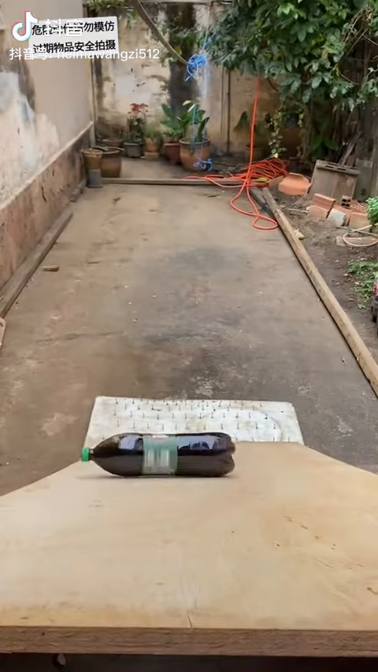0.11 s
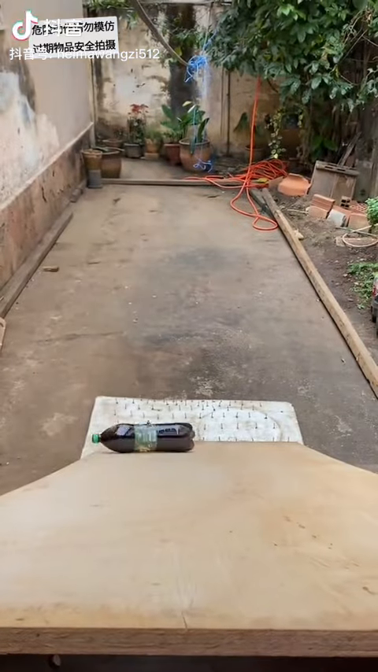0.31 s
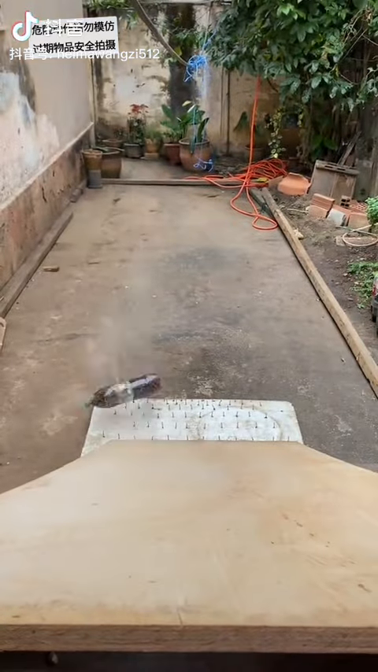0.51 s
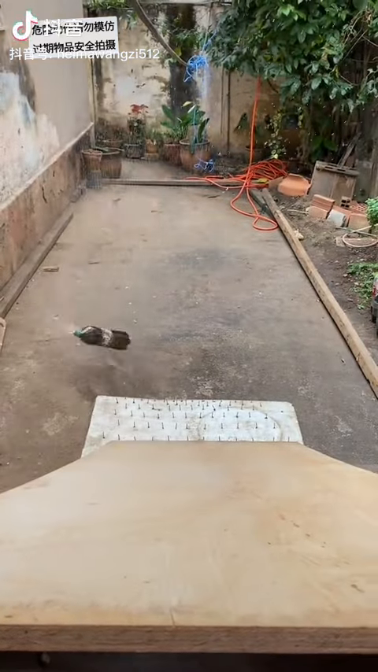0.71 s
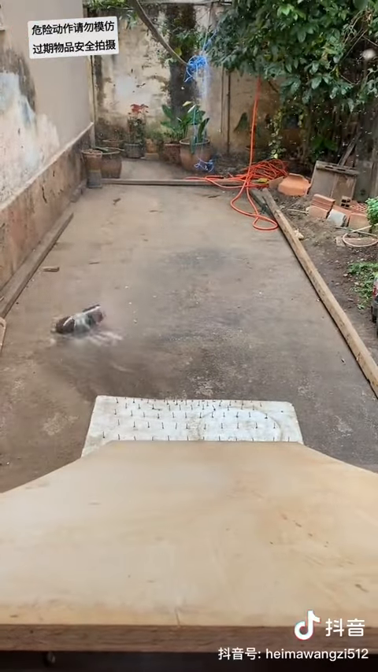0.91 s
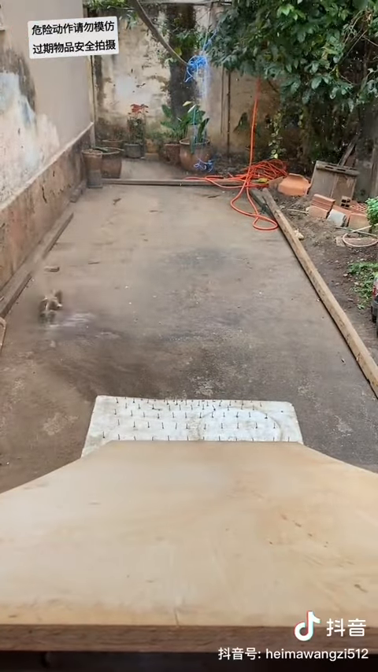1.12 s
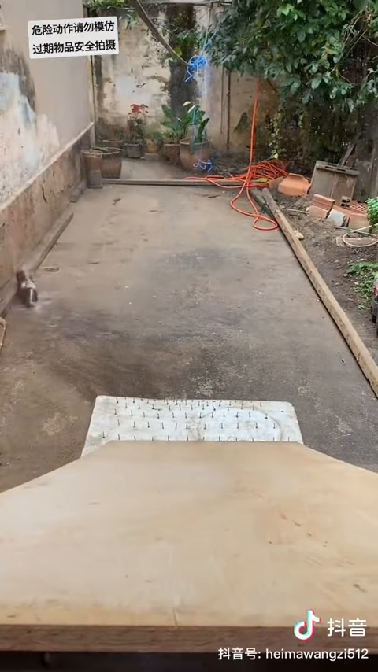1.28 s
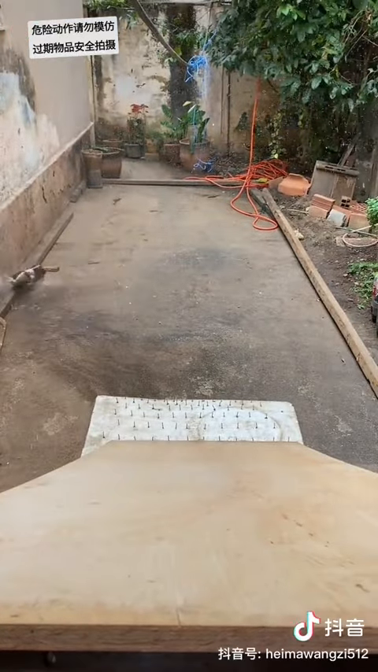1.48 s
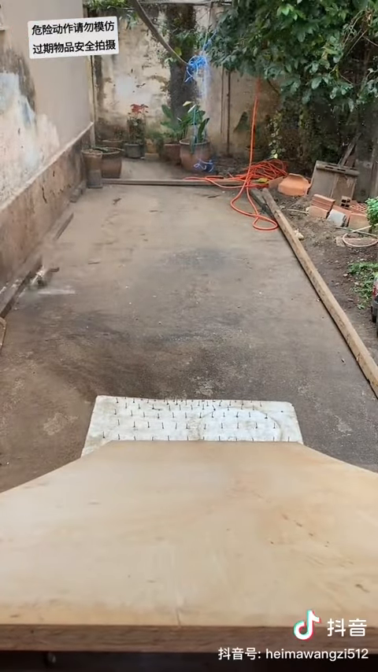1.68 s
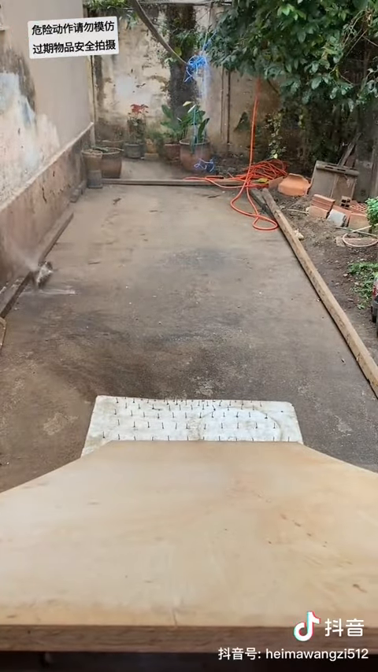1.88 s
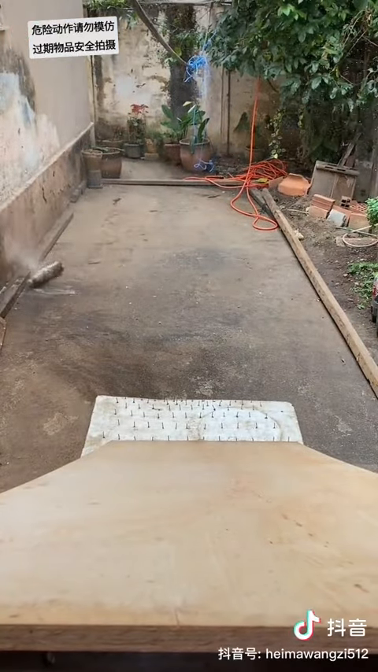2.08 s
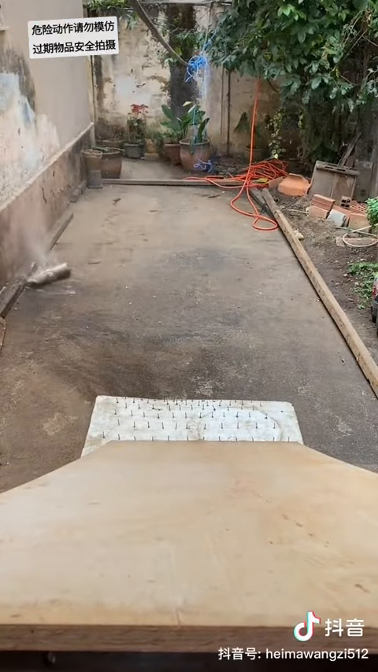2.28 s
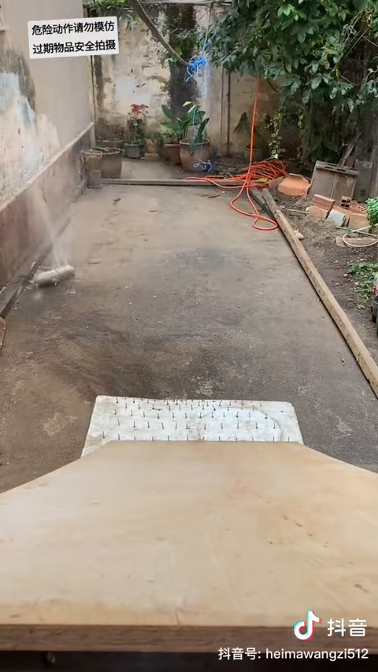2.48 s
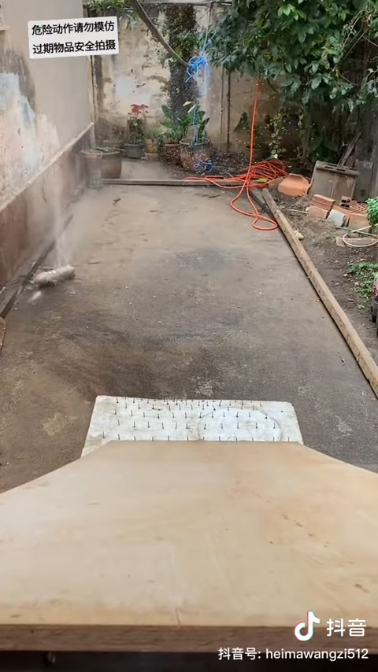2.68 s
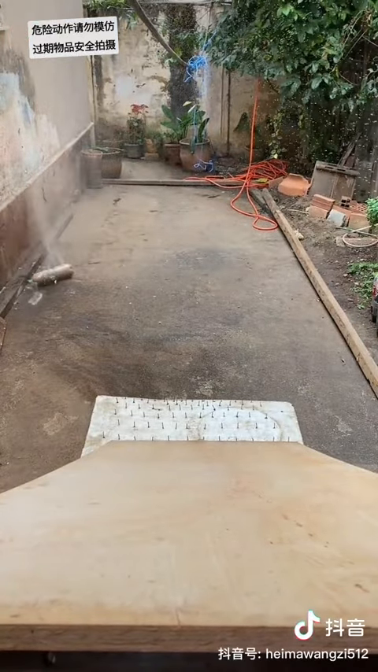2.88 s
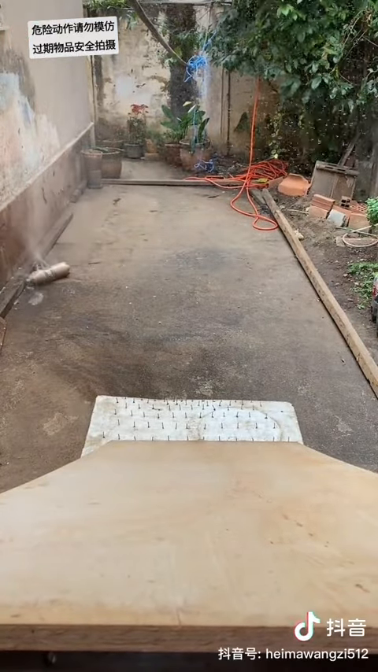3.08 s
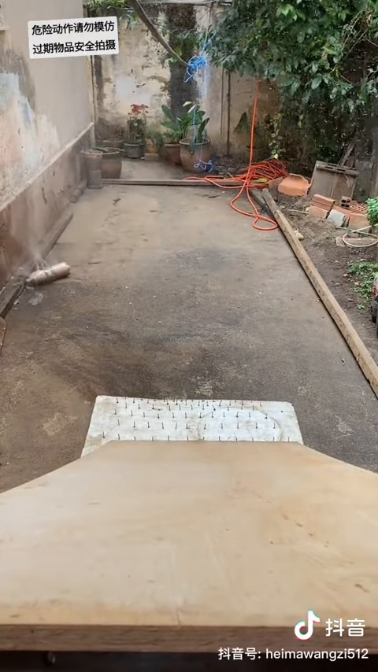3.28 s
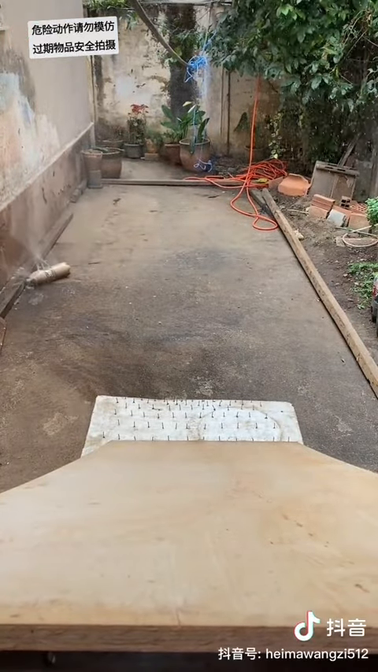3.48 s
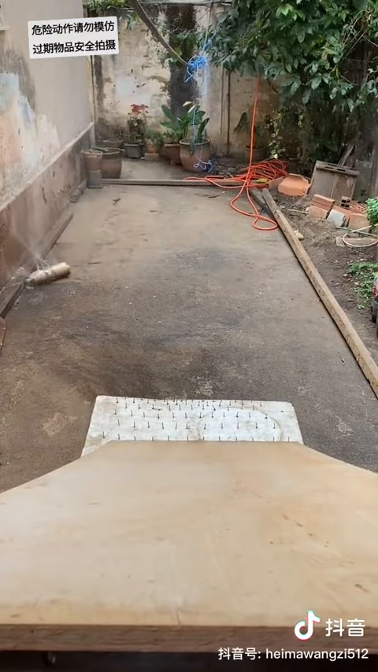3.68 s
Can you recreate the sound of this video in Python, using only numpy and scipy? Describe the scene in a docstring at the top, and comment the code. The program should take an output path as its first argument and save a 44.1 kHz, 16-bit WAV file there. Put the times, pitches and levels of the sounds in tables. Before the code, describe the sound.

A plastic bottle rumbles off a wooden ramp, bursts on nails, tumbles on concrete and keeps hissing

```python
"""Concrete yard: a full plastic bottle rolls down a plywood ramp, crunches over a board of nails and is
punctured. It bounces and scrapes, clangs against metal by the wall and lies there spraying fizzy drink.
Blows ring banks of decaying modes; rolling, nails, grit and jets are coloured noise or random clicks.
A wavering sine hums over faint yard noise; the walls return a short dull tail."""
import sys
import numpy as np
from scipy import signal
from scipy.fft import rfft, irfft
from scipy.io import wavfile

SR = 44100
rng = np.random.default_rng(int(sys.argv[2]) if len(sys.argv) > 2 else 0)


def bounce(signal):
    """Save signal as a 16-bit WAV file at the path given by the first command-line argument."""
    frames = np.transpose(np.atleast_2d(signal))
    limited = np.clip(frames, -1, 1)
    pcm = np.round(limited * 32767).astype(np.int16)
    wavfile.write(sys.argv[1], SR, pcm)


N = 167580
T_S = np.arange(N) / SR

# Spectra list f/Hz, relative density/dB per Hz; coloured() scales each result to rms 1.
# rolling on the ramp: t/s, panel boom level/dB, contact rumble level/dB
ROLL = [(0.0, -32, -36), (0.046, -36, -36.5), (0.154, -31, -39), (0.188, -50, -34), (0.202, -29, -38.5),
        (0.228, -28, -41.5), (0.254, -28.5, -35), (0.286, -25.5, -38.5), (0.31, -40, -48),
        (0.32, -59, -39.5), (0.342, -28, -34.5), (0.384, -37, -51), (0.39, -25, -46), (0.42, -51, -27.5)]
# contact rumble spectrum: f/Hz, density/dB per Hz
RUMBLE_SPECTRUM = [(25, -25), (50, 4), (75, -6), (130, -3.5), (250, -7), (800, -22.5), (1220, -26),
                   (1680, -21.5), (2510, -30), (3070, -27.5), (6500, -29.5), (7300, -63), (8500, -37),
                   (15500, -42), (16000, -65)]
# ticks under the rolling bottle: t/s, level/dB
TICKS = [(0.021, -40), (0.1265, -39), (0.1474, -42), (0.178, -39), (.188, -41), (0.2594, -41), (.323, -44),
         (0.3324, -45), (0.376, -40)]
# tick spectrum: f/Hz, density/dB per Hz
TICK_SPECTRUM = [(400, -16), (1000, -10), (1600, 5), (3000, 5), (5500, -5), (15000, -15)]
# nails tearing over the bottle wall: t/s, level/dB
CRUNCH = [(.4, -55), (.407, -50), (.41, -33), (.42, -32), (.429, -38), (.434, -20), (.442, -12),
          (.452, -10.5), (.463, -11), (.467, -12.5), (.472, -15.5), (.49, -24.5), (.52, -30.5), (.62, -51)]
# crunch spectrum: f/Hz, density/dB per Hz
CRUNCH_SPECTRUM = [(180, -35), (350, 0), (520, -3.5), (900, -4.5), (1250, -8), (1600, 0), (2070, -6),
                   (2800, -8), (6250, -13), (7140, -31), (8700, -21.5), (15500, -33), (16000, -50)]
# landings: t/s, relative thud level/dB, relative level/dB of the bottle's deep boom on concrete, crack level/dB
LANDINGS = [(.447, -10.5, -42, -26), (0.4592, -2.5, -34, -8), (0.484, -19, -42, -31),
            (0.513, -37, -35, -40), (0.784, -24, -42, -36), (.796, -37, -51, -45),
            (0.8864, -13.5, -24.5, -18.5), (0.91, -27, -30, -38), (0.927, -32, -27, -42),
            (.958, -28, -27, -33), (1.128, -30, -28, -45), (1.155, -38, -32, -46), (1.281, -44, -34, -48),
            (1.305, -36, -43, -48), (1.321, -26, -40, -21), (1.339, -35, -42, -50), (1.371, -31, -34, -44),
            (1.426, -36, -38, -46), (1.462, -29, -33, -40)]
# bottle modes: f/Hz, relative level/dB, t60/s
BOTTLE_MODES = [(190, -3, 0.033), (255, 2.5, 0.045), (306, 1, 0.055), (360, -7, 0.035), (392, -2.5, 0.039),
                (482.4, 0, 0.089), (535, -3.5, 0.11), (595, 0, 0.064), (685, -3, 0.018), (811, -2, 0.029),
                (1017, -3, 0.037), (1480, -4, 0.044), (1800, -8, 0.027)]
# bottle dragging along the foot of the wall: t/s, relative level/dB
DRAG = [(1.27, -68), (1.32, -53), (1.359, -63), (1.38, -59), (1.41, -64), (1.45, -47.5), (1.48, -67),
        (1.55, -58), (1.621, -72)]
# hard edge of each blow: f/Hz, density/dB per Hz
CRACK_SPECTRUM = [(400, -6), (1000, -5.5), (1600, -7), (2800, 4), (6000, -15), (7200, -14), (9000, -5),
                  (15500, -19)]
# drink shaking after each landing: f/Hz, density/dB per Hz
SLOSH_SPECTRUM = [(65, -24), (110, 6.5), (210, -5), (285, 1), (358, -2.5), (675, 3), (927, -8),
                  (1500, -7.5), (1950, -49), (3300, -120)]
# skids over the concrete: t/s, level/dB, attack/s, t60/s
SKIDS = [(.786, -30, 0.0033, 0.34), (.89, -29, 0.03, 0.24), (.962, -36, 0.018, 0.11),
         (1.012, -30, 0.039, 0.34), (1.038, -45, 0.012, 0.18), (1.132, -37.5, 0.0075, 0.32),
         (1.205, -38, .025, 0.73), (1.37, -57, 0.034, .3), (1.43, -32, 0.02, 0.98),
         (1.474, -27.5, 0.0035, 0.45)]
# grit spectrum: f/Hz, density/dB per Hz
GRIT_SPECTRUM = [(150, -36), (250, 2), (546, -7), (1370, -1), (1690, 4), (3900, -0.5), (5600, -14),
                 (7000, -7), (9100, -62), (15400, -120)]
# knocks on the metal by the wall: t/s, relative level/dB
KNOCKS = [(1.322, -27), (1.413, -23), (1.424, -23), (1.4645, -14), (1.473, -8)]
# bottle rattling against the metal: t/s, relative level/dB
CHATTER = [(1.4, -58), (1.425, -51), (1.46, -50), (1.478, -49), (1.49, -46), (1.52, -47)]
# metal modes: f/Hz, relative level/dB, t60/s
METAL_MODES = [(2076, -6, .3), (2395, -2, .4), (2796, -8, .05), (2940, -5, .025), (3050, -8, 0.1),
               (3300, -7, 0.09), (3540, -5, 0.06), (3880, -10, .04), (4400, -13, .03), (4910, -12, .04),
               (5570, -15, 0.037)]
# jets of drink from the holes: t/s, upper hiss level/dB, lower hiss level/dB re upper
SPRAY = [(0.5, -36, -6), (0.54, -33, -9.5), (0.6, -35, -8.5), (0.64, -36.5, -13), (0.66, -43.5, -7),
         (0.73, -36, -13), (0.77, -37.5, -9), (0.8, -26.5, -12), (0.86, -30, -13), (0.9, -24.5, -12.5),
         (1.0, -33.5, -9), (1.01, -27, -7.5), (1.14, -35, -7.5), (1.2, -29.5, -6.5), (1.26, -33, -4),
         (1.38, -25, -6.5), (1.45, -29, -5.5), (1.47, -33.5, 9.5), (1.56, -33.5, -3), (1.58, -37.5, 1),
         (1.7, -28.5, -10), (1.76, -31.5, -6.5), (1.79, -27.5, -6), (1.9, -27.5, -3), (1.94, -27, -8),
         (2.04, -26.5, -4.5), (2.21, -28, -5), (2.36, -24.5, -7), (2.68, -27, -5.5), (2.84, -26.5, -7),
         (2.97, -28, -6), (3.28, -31.5, -3.5), (3.31, -29, -5), (3.8, -32.5, -3)]
# jet spectrum: f/Hz, density/dB per Hz
JET_SPECTRUM = [(880, -17), (1500, -16.5), (2460, -9.5), (3480, -11), (4500, -2.5), (5540, 1.5),
                (6350, 0.5), (6800, -21), (7500, -35), (8000, -0.5), (9190, -1.5), (11600, 4.5), (12200, 3),
                (14200, -11.5), (14700, 10), (15500, 0), (15750, -33), (16400, -30)]
# drink wetting the ground: f/Hz, density/dB per Hz
SPLASH_SPECTRUM = [(71, -45), (120, -0.5), (161, 6), (292, -9), (427, -1.5), (662, -16.5), (997, -8),
                   (3500, -10), (4550, -63), (7700, -120)]
# low hum: t/s, centre pitch f/Hz, relative level/dB
HUM = [(0.45, 78.7, -31), (0.47, 77.5, -23), (0.57, 79.2, -44), (0.82, 78.7, -41), (0.87, 75, -57),
       (0.97, 73.3, -36), (1.06, 74, -49), (1.18, 75.2, -42), (1.26, 79.5, -55), (1.32, 82, -38.5),
       (1.38, 86.2, -52), (2.12, 86.5, -43.5), (2.21, 88, -53), (2.26, 90, -42), (2.32, 88.3, -56),
       (2.45, 73.6, -52), (2.52, 73.3, -54), (2.61, 74.7, -58), (2.8, 82, -38), (2.97, 85.7, -41),
       (3.3, 82.4, -54), (3.44, 83.2, -56), (3.6, 89.4, -51), (3.8, 91.1, -70)]
# yard noise: f/Hz, density/dB per Hz
YARD_SPECTRUM = [(18, -43), (30, -8), (87, 0), (206, -14.5), (540, -15.5), (680, -22.5), (1000, -14.5),
                 (1100, -18.5), (3000, -16.5), (3900, -19), (6600, -120)]
# stereo width of coloured sounds: f/Hz, side level/dB re mid
WIDTH = [(60, -61), (110, -70), (200, 0), (380, -11), (700, -7), (1290, -11), (2380, -19), (4400, -11),
         (8120, -6), (15000, -3.5)]

PANEL_HZ, TICK_T60_S = 92.6, 0.048
NAIL_HITS_PER_S, GRIT_PER_S = 3900, 3700
CONTACT_HZ = 870  # soft-contact lowpass
BUILD_CYCLES = 1.736  # low modes speak later
BOOM_HZ, BOOM_T60_S = 142.3, 0.13
SLOSH_RE_THUD_DB, SLOSH_T60_S = -20, 0.32
CRACK_T60_S = 0.0089
CRACK_LAG_S = 0.005  # after the soft start of a landing
CRACK_RE_KNOCK_DB = -5
MUFFLED_S, MUFFLE_DB = 1.518, -18  # the bottle then rests on the metal
JET_SPLIT_HZ = 7200
DROPS_PER_S, DROPS_RE_HISS_DB, DROP_SPREAD_DB = 900, -5, 4
SPLASH_RE_HISS_DB, SPLASH_FADE_DB_PER_S = -8.5, 4
YARD_DB = -47.5
ECHO_DB, ECHO_T60_S, ECHO_CUT_HZ = -9, 0.44, 9300
METAL_ECHO_SEND_DB = -8
PAIR_HZ = 480  # below it both microphones hear the same
PEAK_LIMIT, CUTOFF_HZ = 1.3, 16450


def from_db(db):
    """Amplitude ratio of a level in dB."""
    return 10 ** (np.asarray(db) / 20)


def rms_one(x):
    """Scales to rms 1."""
    return x / np.sqrt(np.mean(x ** 2) + 1e-20)


def in_time(rows):
    """Interpolates each column over the time in the first."""
    t_s, *columns = np.transpose(rows)
    return [np.interp(T_S, t_s, column) for column in columns]


def at_hz(points, hz):
    """Interpolates a spectrum over log frequency."""
    points = np.array(points)
    return np.interp(np.log(hz + 1), np.log(points[:, 0]), points[:, 1])


def between(start_s, end_s, fade_s):
    """Gate with linear fades inside its ends."""
    return np.clip((T_S - start_s) / fade_s, 0, 1) * np.clip((end_s - T_S) / fade_s, 0, 1)


def drift(rate_hz):
    """Slow random wander of rms 1: noise through two equal poles, run at SR / 40."""
    pole = np.exp(-80 * np.pi * rate_hz / SR)
    noise = rng.standard_normal(N // 40 + 2002)
    slow = signal.lfilter([1], [1, -2 * pole, pole * pole], noise)[2000:]  # drop the settling
    return np.interp(np.arange(N) / 40, np.arange(len(slow)), rms_one(slow))


def wavering(hz, rate_hz, pitch_waver, level_waver_db):
    """A near sine, about rms 1, wandering in pitch (a fraction) and level."""
    phase = 2 * np.pi * np.cumsum(hz * (1 + pitch_waver * drift(rate_hz))) / SR
    return np.sqrt(2) * np.sin(phase) * from_db(level_waver_db * drift(rate_hz))


def ring(clicks, hz, t60_s):
    """Two-pole resonator: a unit click starts a decaying sine of height 1."""
    r, w = from_db(-60 / (t60_s * SR)), 2 * np.pi * hz / SR
    return signal.lfilter([0, np.sin(w)], [1, -2 * r * np.cos(w), r * r], clicks + 1e-18)


def grains(per_s, spread_db):
    """Random clicks of uneven size and either sign; rms 1."""
    sizes = from_db(spread_db * np.minimum(rng.exponential(1, N), 4)) * rng.choice([-1, 1], N)
    return rms_one(sizes * (rng.random(N) < per_s / SR))


def coloured(mid, spectrum, patchy_db):
    """Colours a sound, widens it with unrelated noise, lets half-octave bands flicker; rms 1."""
    hz = np.arange(N // 2 + 1) * SR / N
    middle = rfft(mid)
    side = rfft(rng.standard_normal(N)) * from_db(at_hz(WIDTH, hz))
    both = np.array([middle + side, middle - side]) * from_db(at_hz(spectrum, hz))
    if not patchy_db:
        return rms_one(irfft(both, N))
    half_octave = 2 * np.log2(np.maximum(hz, 250) / 250)
    together = drift(6)  # flicker shared by all bands
    out = np.zeros((2, N))
    for k in range(14):
        band = irfft(both * np.clip(1 - abs(half_octave - k), 0, 1), N)
        out += band * from_db(patchy_db * (together / 2 + drift(15.7)))
    return rms_one(out)


def strike(events, modes, scatter_db, build_cycles, shaking):
    """Each blow strikes every mode with a random strength; shaking drives them as well."""
    t_s, db = np.transpose(events)
    luck = rng.normal(0, 1, (len(t_s), len(modes)))
    out = np.zeros(N)
    for k, (hz, level_db, t60_s) in enumerate(modes):
        clicks = shaking * from_db(level_db)
        at = ((t_s + build_cycles / hz) * SR).astype(int)
        clicks[at] += from_db(db + level_db + scatter_db * luck[:, k])
        out += ring(clicks, hz, t60_s) * (-1) ** k  # neighbours in opposite phase
    return out


def bursts(events):
    """Envelope: squared rise ending at each time, then an even dB decay."""
    total = np.zeros(N)
    for t_s, db, attack_s, t60_s in events:
        decay = from_db(db - 60 * np.maximum(T_S - t_s, 0) / t60_s)
        total += decay * np.clip(1 + (T_S - t_s) / attack_s, 0, 1) ** 2
    return total


def ramp():
    """Rolling: the panel booms as a wavering sine, the contact rumbles and ticks as noise."""
    boom_db, rumble_db = in_time(ROLL)
    boom = from_db(boom_db) * wavering(PANEL_HZ, 8, 0.038, 0.6)
    rumble = from_db(rumble_db) * coloured(rng.standard_normal(N), RUMBLE_SPECTRUM, patchy_db=0)
    tick_envelope = bursts([(t_s, db, 0.006, TICK_T60_S) for t_s, db in TICKS])
    ticks = tick_envelope * coloured(rng.standard_normal(N), TICK_SPECTRUM, patchy_db=5)
    return between(-1, 0.51, 0.066) * (boom + rumble) + ticks


def nails():
    """A dense run of clicks: nail tips scratching and piercing the plastic."""
    level_db, = in_time(CRUNCH)
    scratches = coloured(grains(NAIL_HITS_PER_S, spread_db=1.5), CRUNCH_SPECTRUM, patchy_db=0)
    return between(0.397, 0.77, 0.024) * from_db(level_db) * scratches


def thuds():
    """Soft contacts and the drag ring the full bottle's modes; one deep mode booms on the concrete."""
    drag_db, = in_time(DRAG)
    drag = between(DRAG[0][0], DRAG[-1][0], 0.01) * from_db(drag_db) * grains(400, spread_db=1)
    blows = [(t_s, thud_db) for t_s, thud_db, _, _ in LANDINGS]
    rings = from_db(-11.5) * strike(blows, BOTTLE_MODES, 3.6, BUILD_CYCLES, drag)
    booms = [(t_s, boom_db) for t_s, _, boom_db, _ in LANDINGS]
    boom = strike(booms, [(BOOM_HZ, 0, BOOM_T60_S)], 0, BUILD_CYCLES / 2, np.zeros(N))
    soften = signal.butter(1, CONTACT_HZ, fs=SR, output="sos")
    return signal.sosfilt(soften, rings + boom)


def cracks():
    """Hard contact: milliseconds of bright noise at every landing and knock."""
    blows = [(t_s + CRACK_LAG_S, crack_db) for t_s, _, _, crack_db in LANDINGS]
    blows += [(t_s, db + CRACK_RE_KNOCK_DB) for t_s, db in KNOCKS]
    envelope = bursts([(t_s, db, 0.0007, CRACK_T60_S) for t_s, db in blows])
    return envelope * coloured(rng.standard_normal(N), CRACK_SPECTRUM, patchy_db=6)


def slosh():
    """The drink shakes after each landing: a dull decaying noise tail."""
    events = [(t_s + 0.012, db + SLOSH_RE_THUD_DB, 0.015, SLOSH_T60_S) for t_s, db, *_ in LANDINGS]
    return bursts(events) * coloured(rng.standard_normal(N), SLOSH_SPECTRUM, patchy_db=0.5)


def skids():
    """Grit under the bottle: coloured random clicks in a burst for each skid."""
    return bursts(SKIDS) * coloured(grains(GRIT_PER_S, spread_db=1), GRIT_SPECTRUM, patchy_db=0.7)


def metal():
    """Knocks and chatter ring bright modes, muffled once the bottle rests on the metal."""
    chatter_db, = in_time(CHATTER)
    chatter = between(1.4, 1.52, 0.007) * from_db(chatter_db) * grains(2500, spread_db=2)
    clang = from_db(-8) * strike(KNOCKS, METAL_MODES, 1.5, 0, chatter)
    return clang * from_db(MUFFLE_DB * between(MUFFLED_S, 9, 0.0066))


def spray():
    """Jets: bright noise and drop clicks; the table balances lower and upper hiss, splash tracks upper."""
    upper_db, lower_db = in_time(SPRAY)
    drops = from_db(DROPS_RE_HISS_DB) * grains(DROPS_PER_S, DROP_SPREAD_DB)
    hiss = coloured(rms_one(rng.standard_normal(N) + drops), JET_SPECTRUM, patchy_db=1)
    lower = signal.sosfiltfilt(signal.butter(4, JET_SPLIT_HZ, fs=SR, output="sos"), hiss)
    jets = rms_one(hiss - lower) + from_db(lower_db) * rms_one(lower)
    splash_db = SPLASH_RE_HISS_DB - SPLASH_FADE_DB_PER_S * T_S
    splash = from_db(splash_db) * coloured(rng.standard_normal(N), SPLASH_SPECTRUM, patchy_db=2)
    return between(0.413, 9, 0.068) * from_db(upper_db) * (jets + splash)


def walls(x):
    """Close yard walls: a short dull noise tail, different on each side."""
    t_s = T_S[:SR // 2]
    tail = rng.standard_normal((2, len(t_s))) * from_db(-60 * t_s / ECHO_T60_S) * (t_s > 0.008)
    band = signal.butter(1, [300, ECHO_CUT_HZ], "band", fs=SR, output="sos")
    tail = signal.sosfilt(band, tail)
    tail /= np.sqrt(np.sum(tail ** 2) / 2)  # mean energy 1 per side
    return from_db(ECHO_DB) * signal.fftconvolve(x[None], tail, axes=1)[:, :N]


def hum():
    """Background hum: a sine wavering about a moving pitch and level."""
    hz, level_db = in_time(HUM)
    return between(0.37, 9, 0.038) * from_db(level_db - 1) * wavering(hz, 5.18, 0.0181, 0.99)


def yard():
    """Steady, mostly low yard noise."""
    return from_db(YARD_DB) * coloured(rng.standard_normal(N), YARD_SPECTRUM, patchy_db=0)


def scene():
    """Sums the layers; only body and clang feed the wall tail."""
    body, clang = thuds(), metal()
    echo = walls(body + from_db(METAL_ECHO_SEND_DB) * clang)
    blows = body + clang + echo + cracks() + slosh()
    return blows + ramp() + nails() + skids() + spray() + hum() + yard()


def record(dry):
    """Peaks are rounded, close microphones share the bass, the top is cut."""
    left, right = PEAK_LIMIT * np.tanh(dry / PEAK_LIMIT)
    mid = (left + right) / 2
    side_highpass = signal.butter(5, PAIR_HZ, "high", fs=SR, output="sos")
    side = signal.sosfilt(side_highpass, (left - right) / 2)
    top_cut = signal.cheby2(12, 70, CUTOFF_HZ, fs=SR, output="sos")
    return signal.sosfilt(top_cut, [mid + side, mid - side])


dry = scene()
out = record(dry)
bounce(out)
```